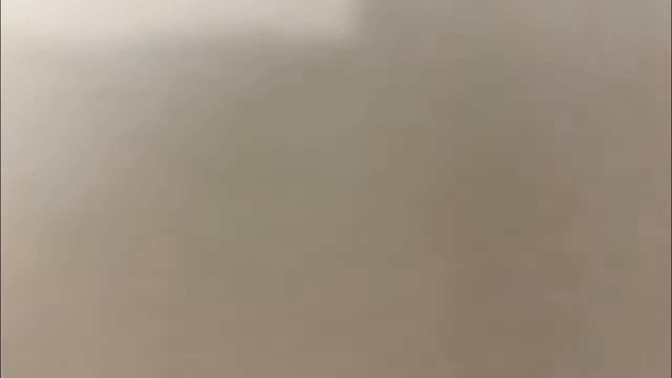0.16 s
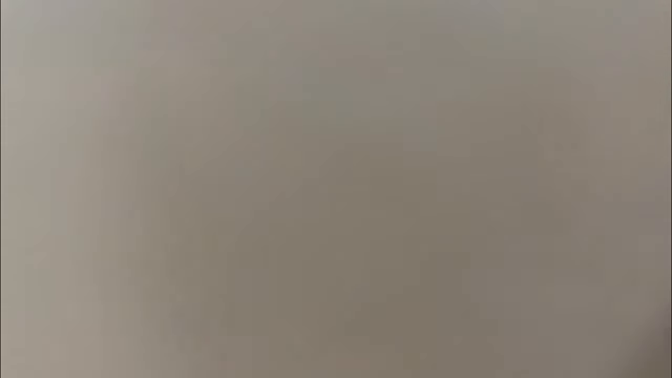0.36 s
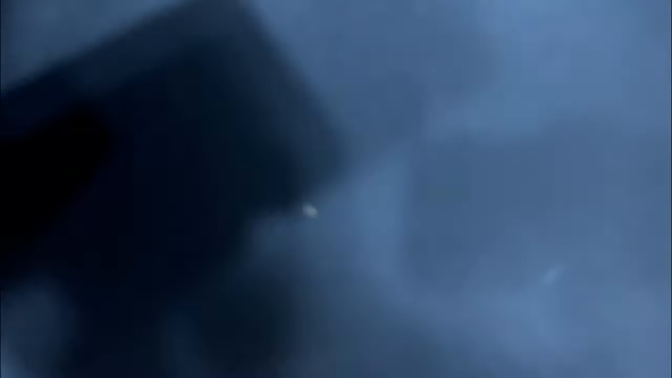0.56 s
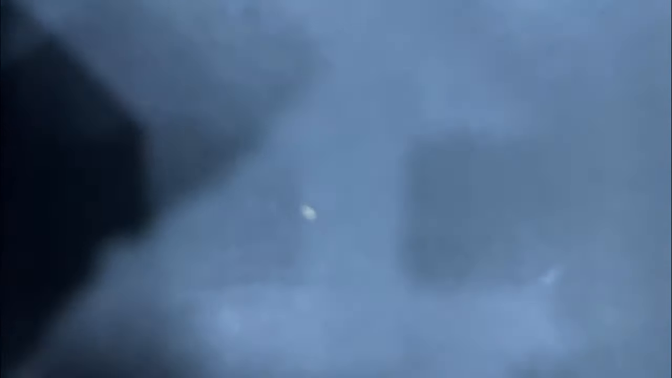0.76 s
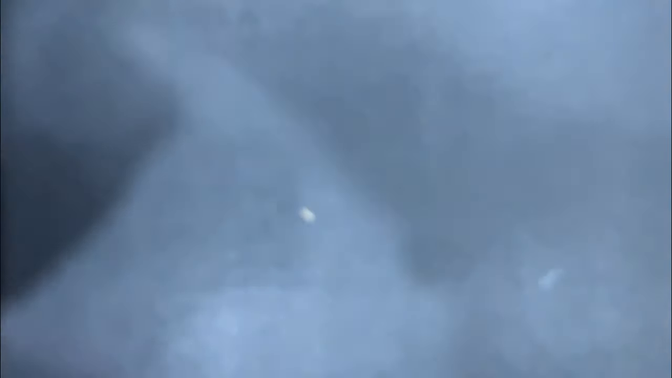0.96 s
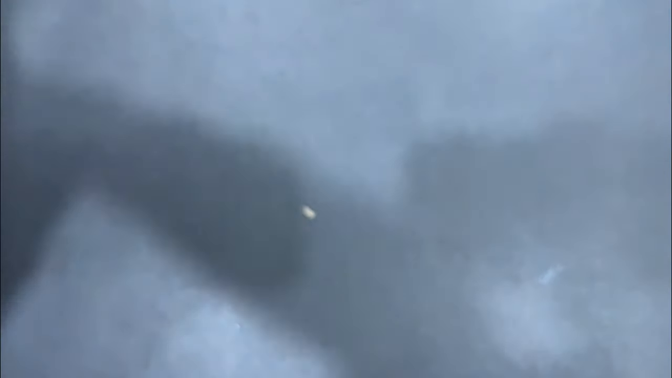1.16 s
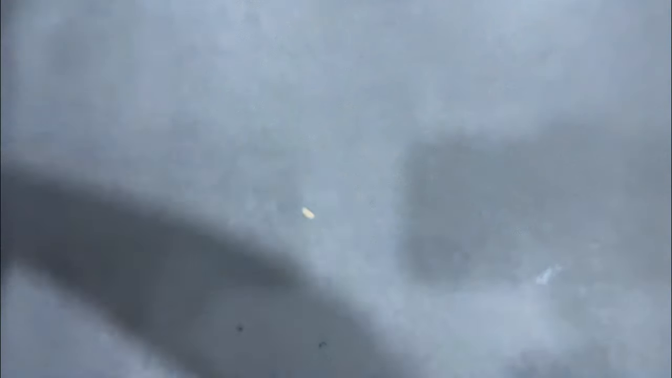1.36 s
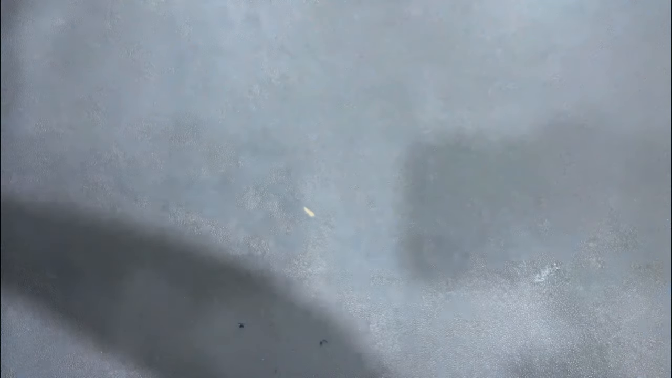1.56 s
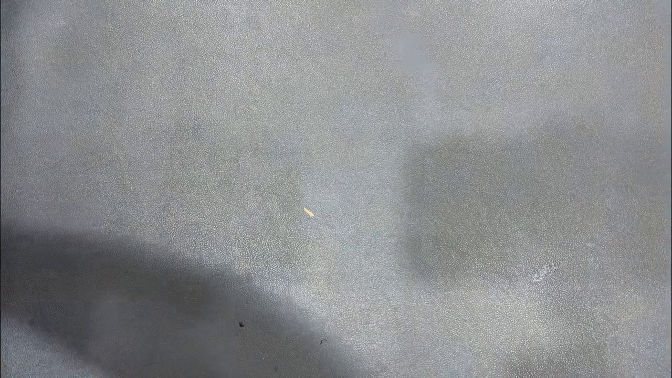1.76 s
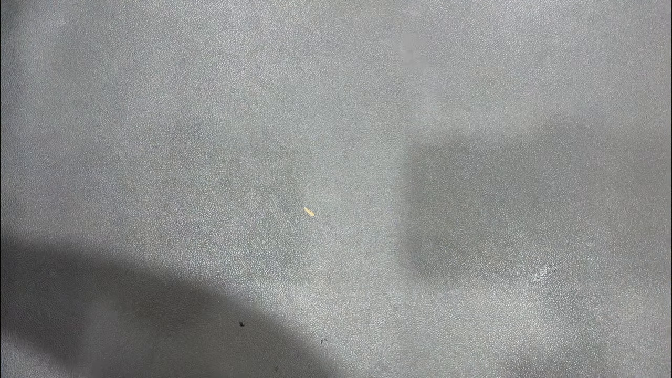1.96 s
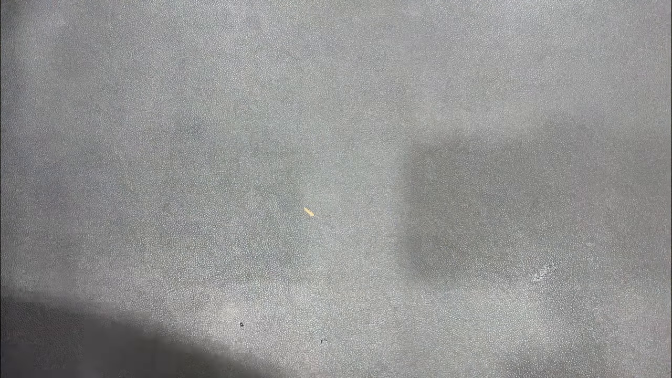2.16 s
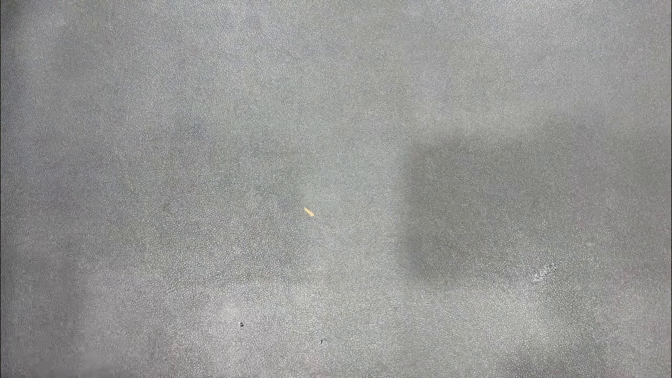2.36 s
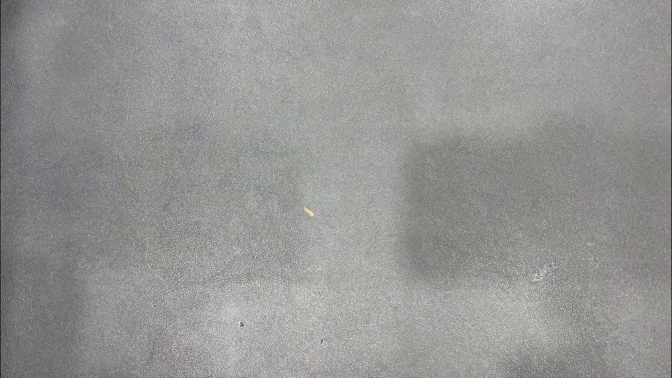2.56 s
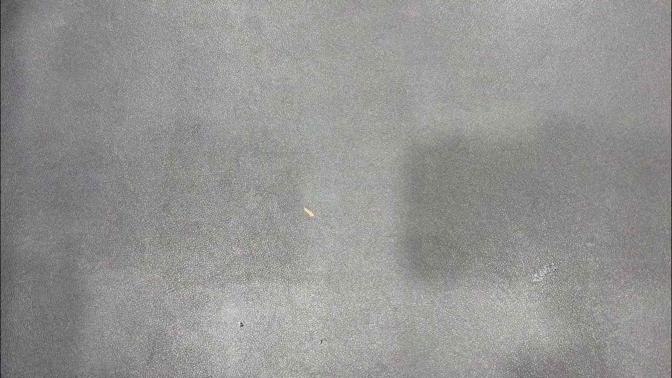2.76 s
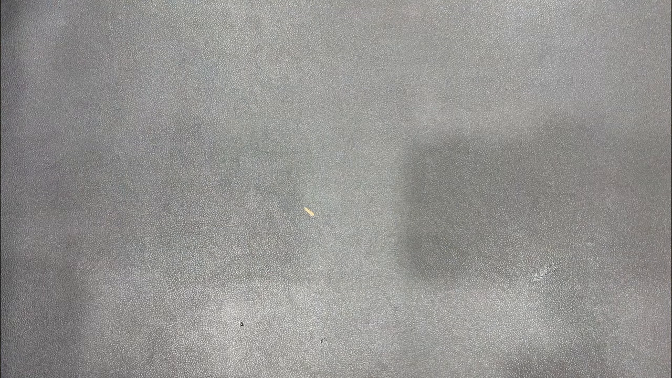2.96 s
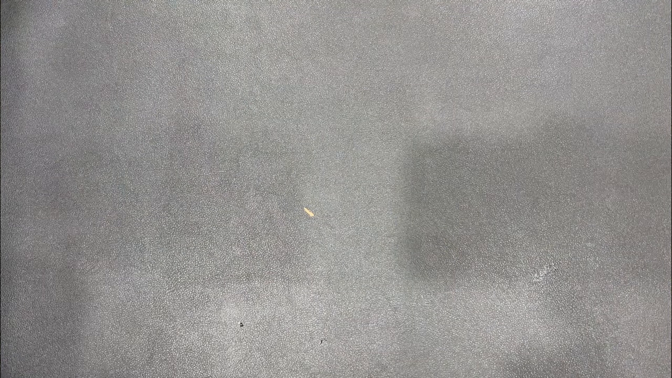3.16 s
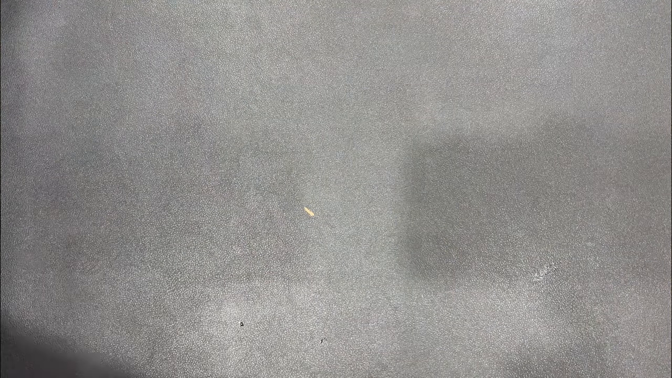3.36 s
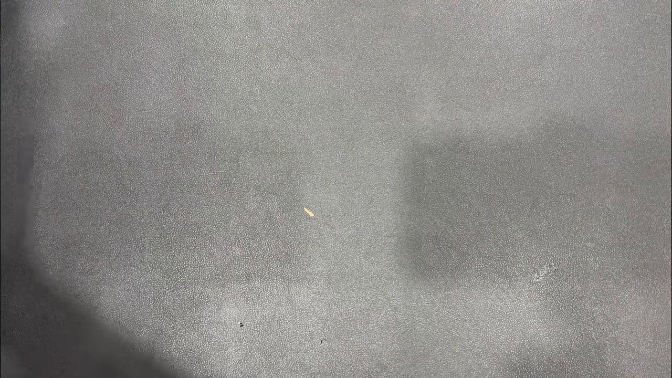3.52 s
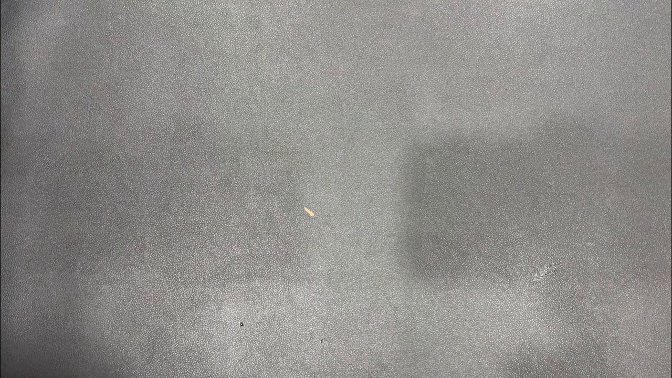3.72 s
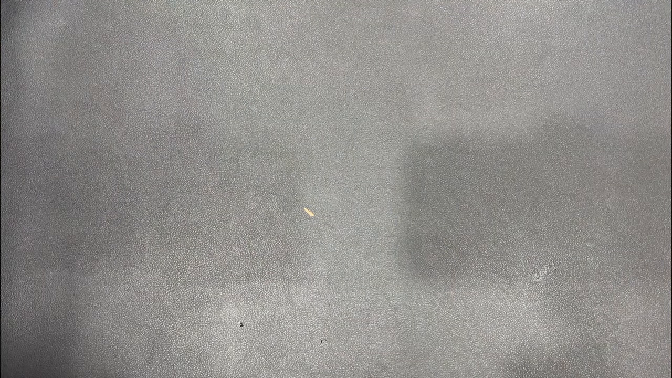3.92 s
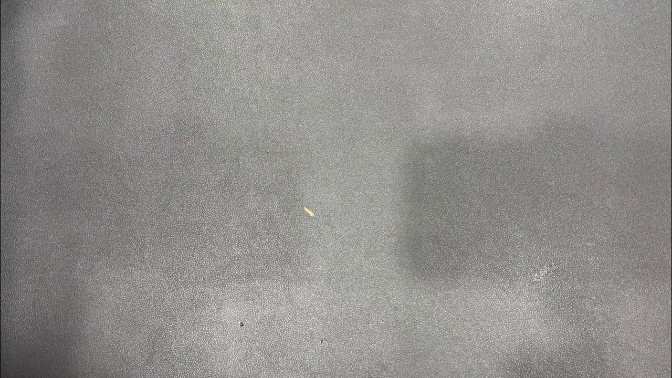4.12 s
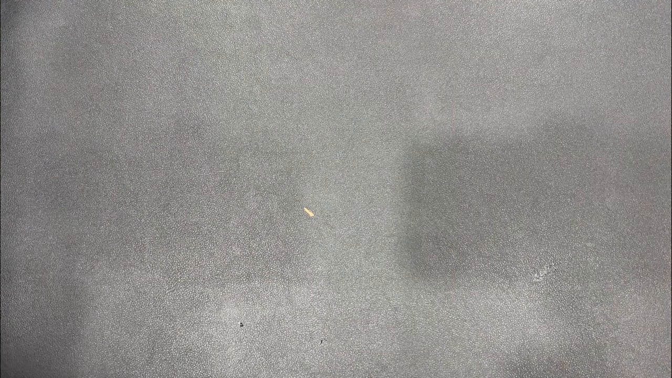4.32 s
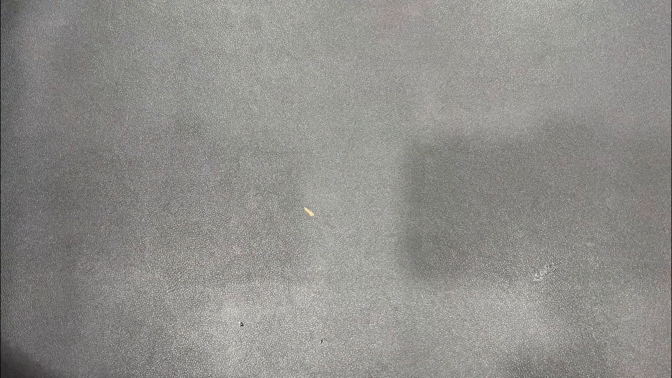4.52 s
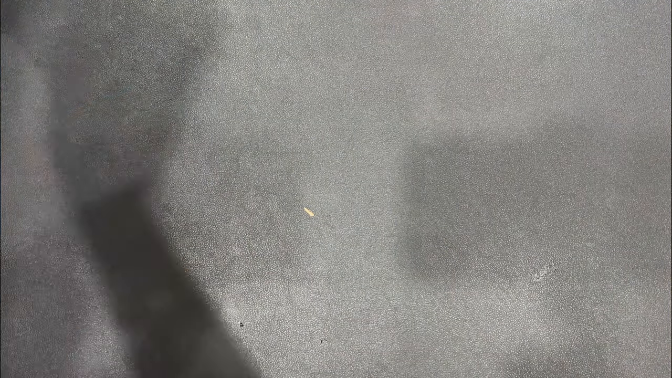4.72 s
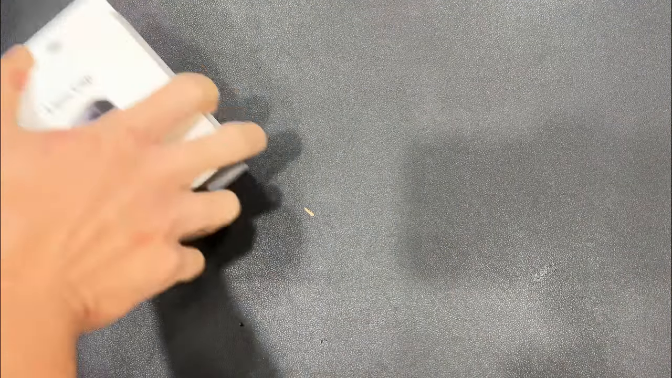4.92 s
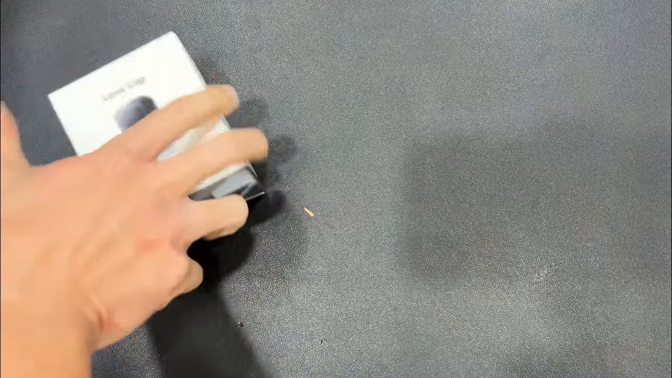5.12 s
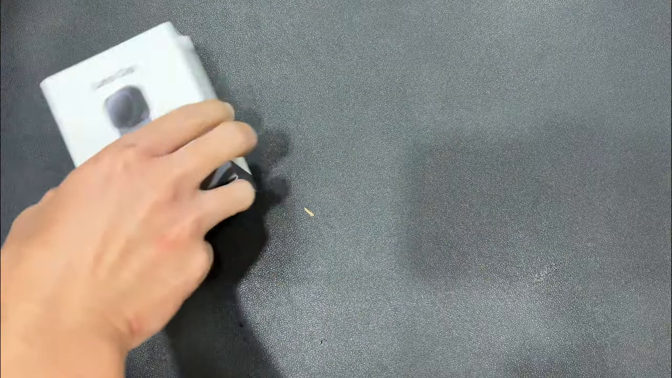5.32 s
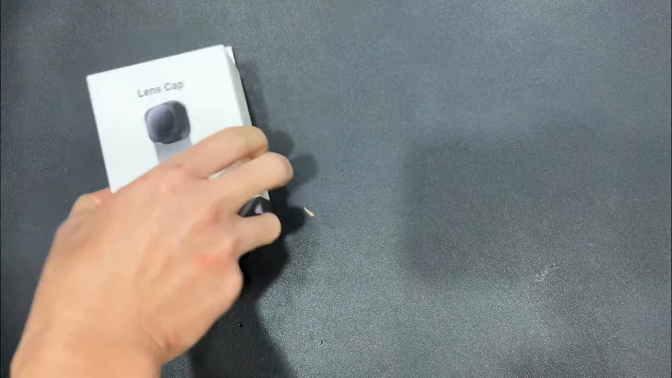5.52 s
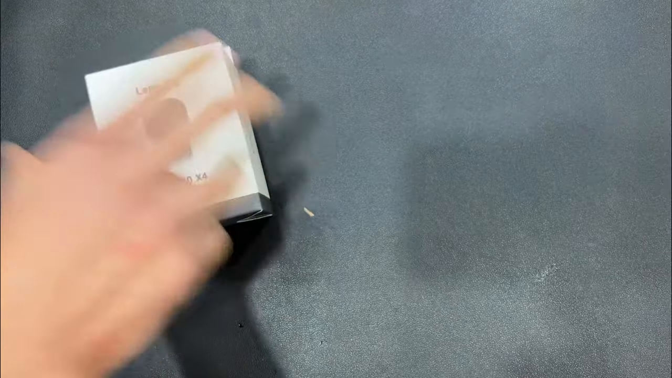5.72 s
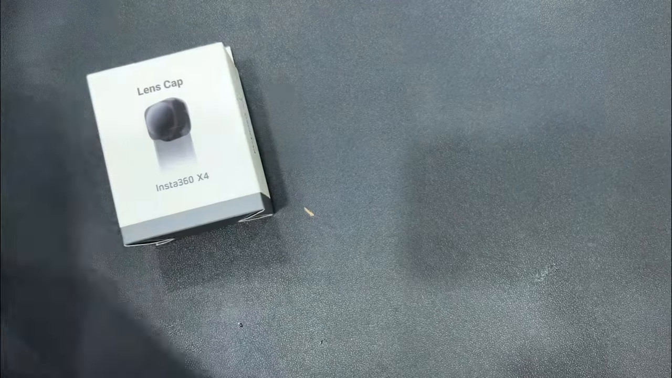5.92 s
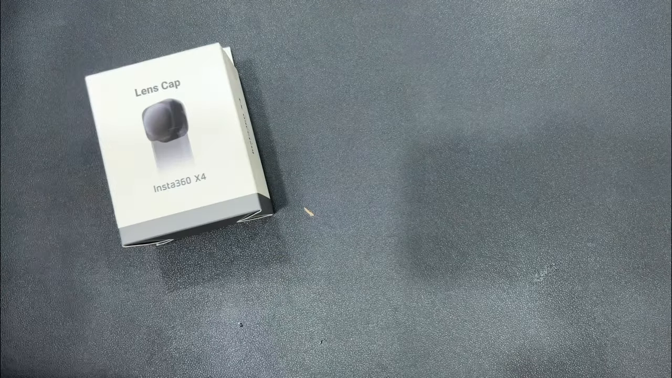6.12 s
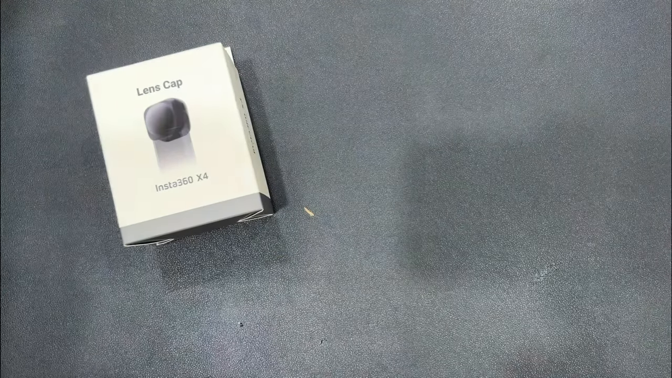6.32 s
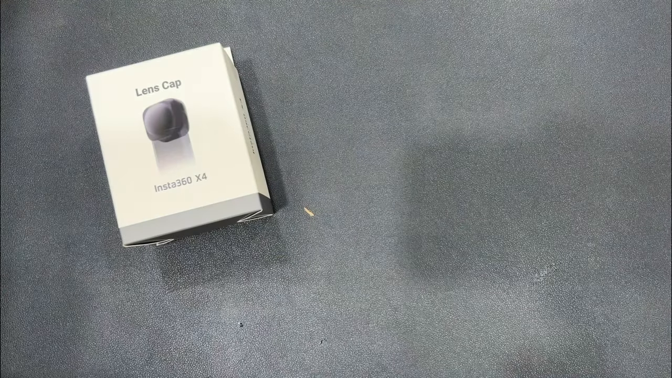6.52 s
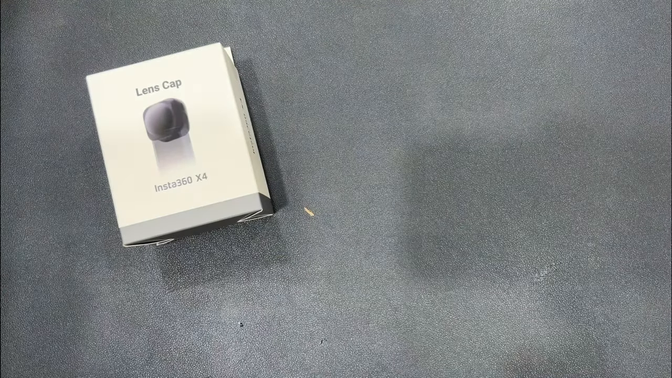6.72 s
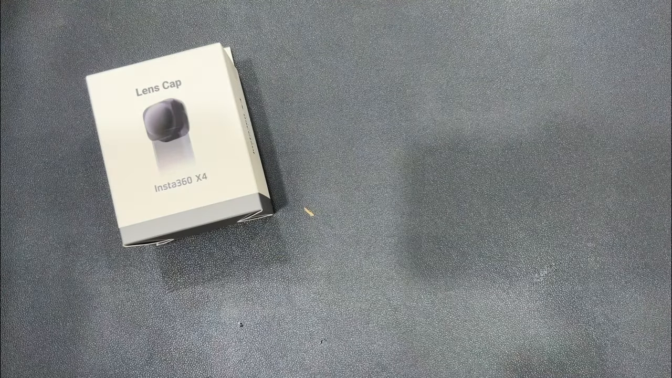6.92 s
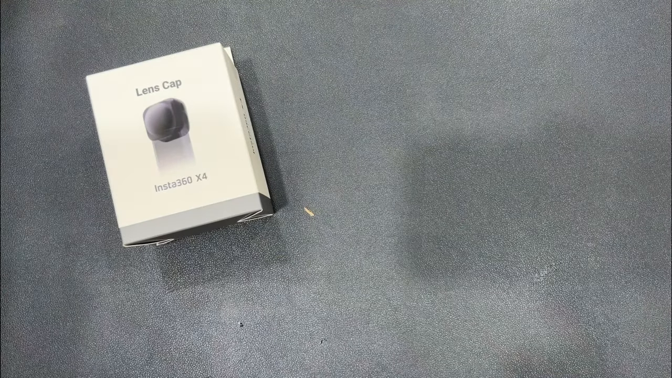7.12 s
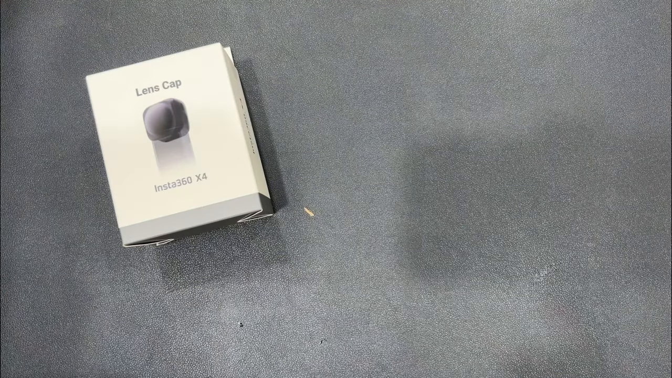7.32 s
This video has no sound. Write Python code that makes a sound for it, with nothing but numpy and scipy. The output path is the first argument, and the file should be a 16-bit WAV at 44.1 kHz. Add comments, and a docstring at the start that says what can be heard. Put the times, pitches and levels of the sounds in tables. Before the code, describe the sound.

Sharp cardboard thuds and a loud double clack on a tabletop, crackly paper rubbing, then another knock and soft scraping in a small room.

```python
"""Cardboard boxes are bumped, opened and set down on a table in a small quiet room, near a two-port microphone.
Knocks are built of low, middle and high rings, each a sum of decaying sine modes of box and table top;
edges tick and paper fibres snap as crackly noise bursts, and paper and card rub as grainy hiss.
Low rumble and murmur fill the room at rest, with a narrow wavering hum. The walls answer with scattered
noise tails, the microphone colours the whole, and a soft limit keeps the peaks below full scale."""
import sys
import numpy as np
from scipy import signal
from scipy.fft import rfft, irfft, next_fast_len
from scipy.io import wavfile
from scipy.ndimage import uniform_filter1d

SR = 44100
rng = np.random.default_rng(int(sys.argv[2]) if len(sys.argv) > 2 else 0)


def to_wav(sig):
    """Store sig (one row per channel, or 1-D mono) as 16-bit WAV at the path in sys.argv[1].

    Samples outside -1..1 are clipped; the rate is SR.
    """
    pcm = np.clip(np.atleast_2d(sig), -1, 1) * 32767
    pcm = np.round(pcm).astype(np.int16)
    wavfile.write(sys.argv[1], SR, pcm.T)  # frames by channels


N = 329868  # length in samples


def amp(db):
    """Gain of a level in dB."""
    return 10 ** (np.asarray(db) / 20)


def unit(x):
    """x scaled to rms 1."""
    return x / np.sqrt(np.mean(x ** 2) + 1e-20)


def along(points, hz):
    """Interpolate (pitch_hz, value) points on a log pitch axis."""
    point_hz, value = np.transpose(points)
    return np.interp(np.log(hz + 1), np.log(point_hz + 1), value)


def filtered(x, response):
    """Multiply the spectrum of x by a complex response of frequency."""
    size = next_fast_len(x.shape[-1] + 8192)  # padding for the filter's ringing
    spectrum = rfft(x, size) * response(np.fft.rfftfreq(size, 1 / SR))
    return irfft(spectrum, size)[..., :x.shape[-1]]


# Likeness of scattered sound at the two ports: pitch_hz, likeness (0 to 1)
PORT_LIKENESS = [(60, 0.96), (180, 1), (550, 0.21), (1650, 0.27), (4970, 0.12), (15000, 0.61)]


def spread(pair):
    """Mix two unrelated signals until they are as alike as scattered sound is at the two ports."""
    def mid_and_side(hz):
        turn = np.arccos(np.clip(along(PORT_LIKENESS, hz), 0, 1)) / 2
        return np.array([np.cos(turn), np.sin(turn)])

    mid, side = filtered(pair, mid_and_side)
    return np.array([mid + side, mid - side])


LEAD_RAD, LEAD_FROM_HZ = .65, 4900  # phase turn at each port, and the pitch where it sets in


def ahead(x):
    """In the treble of direct sound the right port leads in phase."""
    def lead(hz):
        turn_rad = LEAD_RAD * hz ** 8 / (hz ** 8 + LEAD_FROM_HZ ** 8)
        return np.exp(1j * np.outer([-1, 1], turn_rad))

    return filtered(x, lead)


# How fast the small room dies away: pitch_hz, t60_s
ROOM_DECAY = [(80, 0.38), (300, 0.38), (1500, 0.38), (6000, 0.36), (14000, 0.24)]


def decay(length):
    """Two scattered noises in which each frequency dies at the room's speed for it."""
    hz, t, noise = signal.stft(rng.standard_normal((2, length)), SR, nperseg=256)
    fading = noise * amp(-60 * t / along(ROOM_DECAY, hz)[:, None])
    return spread(signal.istft(fading, SR, nperseg=256)[1][:, :length])


def room(x):
    """The walls' answer to a lasting sound, by convolution with a decaying noise tail."""
    tail = decay(SR // 2)
    tail /= np.linalg.norm(tail[0])
    late = np.pad(x, (150, 0))  # the answer starts 150 samples late
    return signal.fftconvolve(late[None], tail, axes=1)[:, :N]


# Spectrum of the low rumble in the room at rest: pitch_hz, relative level_db (per Hz)
RUMBLE_COLOUR = [(18, -52), (30, -24.5), (81, 0.5), (104, -11.5), (156, -11), (171, -7), (219, -7),
                 (305, -16), (402, -19.5), (700, -31.5), (910, -63.5), (1540, -120)]
# Spectrum of the murmur above it: pitch_hz, relative level_db (per Hz)
MURMUR_COLOUR = [(350, -37.5), (600, -3), (707, -9.5), (767, -8), (810, -7.5), (1150, -18), (1810, -20.5),
                 (2500, -22), (3000, -33.5), (15600, -44.5)]
# The hum: pitch_hz, width_hz (rms wander of its pitch), level_db
HUM_TONE = (73, 2.8, -62)
RUMBLE_DB, MURMUR_DB = -55, -71


def stillness():
    """The room's rumble and murmur are coloured noise; the hum is a sine whose pitch wanders randomly."""
    def coloured(points):
        return unit(filtered(rng.standard_normal((2, N)), lambda hz: amp(along(points, hz))))

    rumble, murmur = coloured(RUMBLE_COLOUR), coloured(MURMUR_COLOUR)
    hum_hz, width_hz, hum_db = HUM_TONE
    waver = unit(filtered(rng.standard_normal(N), lambda hz: 1 / (1 + (hz / 6) ** 2)))
    hum = np.sqrt(2) * np.sin(2 * np.pi * np.cumsum(hum_hz + width_hz * waver) / SR)
    return spread(amp(RUMBLE_DB) * rumble + amp(MURMUR_DB) * murmur) + amp(hum_db) * hum


# Strokes of paper and card: start_s (of full strength), relative level_db, swell_s (to rise 20 dB), hold_s,
# fade_s (to fall 20 dB), dullness_db (per octave); a swell or fade below 3 ms, or negative, acts as 3 ms
PAPER_STROKES = [(0, -50, .01, 0, 0.32, 6), (0.078, -59, -0.8, 0.043, -0.33, 7.5),
                 (0.266, -60, 0.03, 0, 0.64, 13.5), (0.99, -69, -1.35, 0.023, 0.35, 7),
                 (1.124, -72.5, -1.2, 0.1, 0.74, 12), (1.804, -57.5, 0, 0.11, 0.56, 14.5),
                 (1.9, -38.5, 0.0264, 0, 0.2624, 6), (2.097, -44.5, 0.1, 0.0053, 0.08, 2),
                 (2.223, -56.5, 0.1, 0, 0.2, 0), (2.388, -58.5, 0.02, 0, 0.09, 9.5),
                 (2.752, -48.5, 0, 0.035, 0.14, 5.5), (2.934, -53.5, 0, 0.23, 0.38, 3),
                 (3.145, -41, 0.1942, 0.023, 0.16, -1.5), (3.347, -52, 0.46, 0, 0.12, 6.5),
                 (3.517, -37.5, -0.14, 0.02, 0.08, -2.5), (3.552, -37, -0.03, 0, 0.22, 1.1),
                 (3.702, -37.5, 0.0836, .2, 0.1861, -2), (4.07, -52.5, -0.67, 0.28, -0.01, -2),
                 (4.124, -44.5, -0.03, 0, 0.05, -3), (4.167, -49, 0, 0.023, 0, -4),
                 (4.296, -45.5, 0.02, 0.0018, 0.02, 1), (4.386, -45, 0.01, 0.0045, 0.15, -1),
                 (4.49, -56.5, 1.27, 0.048, -0.05, -0.3), (4.582, -72, 3, 0, 0.7, 10),
                 (5.098, -48, 0.0862, 0.013, 0.1561, 4.5), (5.286, -58.5, 0.17, 0.025, 0.12, 7.5),
                 (5.516, -60, 0, 0.03, 0.16, 6.5), (6.254, -43.5, -0.084, 0.14, 0.1, -0.5),
                 (6.475, -54, 0.13, 0, 1, 1.6), (6.928, -41, 0.0964, 0.078, 0.24, -0.9),
                 (7.17, -48.5, 0.15, 0.15, -0.5, 1.5), (7.276, -35, 0.19, 0, 0.12, -3),
                 (7.435, -49, 0.23, 0.039, -2.9, -0.3)]


def strokes(t):
    """Strength of the rubbing at times t, and its dullness, led by the loudest stroke."""
    start, db, swell, hold, fade, dull = np.transpose(PAPER_STROKES)[:, :, None]
    before = np.maximum(start - t, 0) / np.maximum(swell, .003)
    after = np.maximum(t - start - hold, 0) / np.maximum(fade, .003)
    power = amp(db - 20 * np.minimum(before + after, 5)) ** 2  # at most 100 dB down
    total = power.sum(axis=0)
    return np.sqrt(total), (power * dull).sum(axis=0) / total


# Colour of rubbed paper, before each stroke's dullness: pitch_hz, relative level_db (per Hz)
PAPER_COLOUR = [(180, -34.5), (300, 4), (810, -1.5), (1210, -1), (1350, -7), (1520, 0.5), (1850, -0.5),
                (4240, -3), (8510, -4.5), (9710, -7), (11100, -6.5), (15700, -12)]
CATCHES_PER_S, CATCH_FADE_S = 300, 0.00047


def rubbing():
    """Fibres catch and slip: hiss whose strength jumps in short grains, patchy in colour."""
    noise = signal.stft(rng.standard_normal((3, N)), nperseg=256)[2]
    hz = np.linspace(0, SR / 2, noise.shape[1])[:, None]
    t = np.arange(noise.shape[2]) * 128 / SR
    strength, dull_db = strokes(t)
    patches = uniform_filter1d(rng.standard_normal(noise.shape[1:]), size=5, axis=0)
    patches = uniform_filter1d(patches, size=9, axis=1)
    colour = amp(along(PAPER_COLOUR, hz) - dull_db * np.log2(hz / 5000 + 0.35))
    colour /= np.sqrt(np.mean(colour ** 2 * (hz > 1500), axis=0))  # level set by the band above 1500 Hz
    hiss = signal.istft(noise * colour * amp(2.2 * unit(patches)), nperseg=256)[1][:, :N]
    catches = (rng.random(N) < CATCHES_PER_S / SR) * amp(2.6 * rng.exponential(size=N))
    slip = np.exp(-1 / (CATCH_FADE_S * SR))
    grain = 1 + .6 * signal.lfilter([1], [1, -slip], np.minimum(catches, 5))
    return np.interp(np.arange(N) / SR, t, strength) * unit(grain) * hiss


# Edge contacts: start_s, relative level_db, centre_hz, above_db (fall per octave above centre, sign ignored),
# t60_s (of the burst, at least 3 ms)
EDGE_TICKS = [(0.031, -29, 1200, 4.5, 0.029), (0.09, -27.5, 2080, 23, 0.019), (.0895, -34, 9500, 7, .015),
              (0.1085, -29, 8500, 1.5, 0.012), (.147, -36, 9500, 7.5, .012),
              (0.1555, -25.5, 4500, 13.5, 0.01), (0.2648, -26, 1520, 3.5, 0.015),
              (.4255, -37.5, 1490, 10, 0.0083), (0.448, -3.5, 2470, 21, 0.028),
              (0.4486, -30, 10000, -0.5, 0.04), (0.4863, 4, 1600, 16.5, 0.016),
              (0.486, -5.5, 7950, -1, 0.01), (0.4938, -5.5, 1690, 11.5, .013),
              (0.4946, -8, 8003, 1.5, 0.0058), (0.511, -5, 1697, 11.5, .018),
              (0.5109, -17, 8000, -2, 0.017), (.557, -40.5, 7000, -5, 0.017),
              (0.583, -35, 6500, 3.5, 0.021), (1.8136, -43, 1570, 2.5, 0.027),
              (1.8812, -7.5, 3800, 8.5, 0.018), (1.8879, -7, 3620, 11, 0.011),
              (1.8915, -7, 3540, 12, 0.032), (1.9172, -8.5, 3700, 7.5, 0.027),
              (1.923, -11, 5360, 22.5, 0.024), (1.93, -24.5, 2430, 15, 0.48), (2.086, -26, 7000, 3, 0.015),
              (2.535, -47.5, 5990, 12, 0.014), (2.1, -21, 1550, 3, 0.035), (2.208, -33, 1580, 3.5, 0.028),
              (2.377, -44, 2940, -5, .02), (2.3885, -33.5, 4460, 3.5, 0.02),
              (2.7453, -29, 1900, 2.5, 0.016), (3.2258, -21.5, 7700, 7.5, 0.032),
              (3.273, -25.5, 2060, 7.5, 0.038), (3.4486, -38.5, 5530, 11, 0.027),
              (3.5154, -18, 5700, 2.5, 0.029), (3.5498, -11, 8600, 4, 0.042),
              (4.3818, -28, 8070, 14, 0.034), (4.82, -48.5, 2320, 0.5, 0.024),
              (4.979, -46, 1800, 6.5, 0.06), (5.038, -13, 1530, 6.5, 0.077), (5.114, -27, 1210, 13, 0.018),
              (5.332, -38, 2230, 3, 0.031), (5.471, -23, 1820, 5.5, 0.021), (5.4988, -25.5, 2010, 5, 0.03),
              (6.244, -36.5, 6000, 12, .05), (6.517, -30.5, 8700, 9, 0.028), (6.6514, -34, 4940, 2, 0.032),
              (6.818, -34, 2330, 0, 0.034)]
# Paper fibres snapping: start_s, relative level_db
FIBRE_SNAPS = [(.312, -48), (2.9635, -30), (3.1303, -25.5), (3.1714, -26), (3.188, -29), (3.34, -36),
               (3.735, -24), (3.7468, -22), (3.77, -22), (4.045, -36.5), (4.1322, -32.5), (4.175, -32),
               (4.204, -30.5), (4.281, -31), (4.288, -31), (4.357, -34), (6.2525, -31.5), (6.2633, -26),
               (6.2851, -29), (6.292, -26.5), (6.3672, -26), (6.581, -38)]
# Shape shared by all snaps: centre_hz, above_db (fall per octave above centre), t60_s
FIBRE_SHAPE = (8300, 8.2, 0.015)
SNAP_BOOST_DB = 4.5  # lift of the snaps against the ticks
CRACKLE_DB, RISE_SHARE = 5, 0.025  # scatter of strength within a tick; its rise as a share of its t60
# the fall per octave below a centre steepens by BELOW_DB for each octave the centre lies above BELOW_FROM_HZ
BELOW_DB, BELOW_FROM_HZ = 2, 590


def ticks():
    """Edges and fibres give short crackly noise bursts around a pitch; each draws its own wall answer."""
    out, t = np.zeros((2, N + SR)), np.arange(SR // 3) / SR
    rows = EDGE_TICKS + [(start, db + SNAP_BOOST_DB, *FIBRE_SHAPE) for start, db in FIBRE_SNAPS]
    noise = rng.standard_normal((len(rows), len(t)))
    steps = rng.standard_normal((len(rows), len(t) // 30 + 1))
    crackle = amp(CRACKLE_DB * np.repeat(steps, 30, axis=1)[:, :len(t)])  # new strength every 30 samples
    for (start, db, centre, above_db, t60), hiss, grit in zip(rows, noise, crackle):
        def colour(hz):
            below_db = BELOW_DB * np.log2(centre / BELOW_FROM_HZ)
            slope_db = np.where(hz < centre, below_db, -abs(above_db))
            return amp(slope_db * np.log2((hz + 150) / centre))

        t60 = max(t60, .003)
        shape = amp(-60 * t / t60) * (1 - np.exp(-t / (RISE_SHARE * t60)))
        burst = shape * ahead(filtered(hiss * grit, colour))
        burst *= np.linalg.norm(shape) / np.linalg.norm(burst[0])
        walls = filtered(decay(len(t)), colour) * (1 - np.exp(-t / .006))
        walls *= amp(-10.0) * np.linalg.norm(shape) / np.linalg.norm(walls[0])
        out[:, round(start * SR):][:, :len(t)] += amp(db - 8.5) * (burst + walls)
    return out[:, :N]


# Low, middle and high rings of knocks; several rows may sound in one knock: start_s,
# level_db (peak of the ring before lean and walls), pitch_hz (favoured), ring_share (of the modes' t60,
# kept within .1 to 4), focus_db (per octave), contact_s (at least 0.5 ms)
KNOCK_RINGS = [(.006, -15, 324, 0.45, 19, 0.0074), (.004, -34, 940, 0.72, 59, 0.0017),
               (.011, -21, 137, 0.24, 25.5, 0.0021), (.029, -20.5, 161, 0.61, 28, 0.006),
               (.054, -24, 152, 0.43, 34.5, 0.01), (0.03, -33.5, 896, 0.98, 76, 0.0044),
               (.165, -30, 104, 0.31, 13.5, 0.0084), (.266, -26.5, 482, 0.25, 17.5, 0.0025),
               (0.283, -35, 153, 0.46, 17.5, 0.0072), (.389, -37.5, 61.5, 1, 9, 0.0086),
               (0.425, -40, 743, 2.3, 10, 0.02), (.448, -7.5, 487, 0.12, 14.5, 0.0035),
               (.449, -8, 743, 0.22, 16, 0.001), (.4575, -7.5, 109, 0.33, 12, 0.0071),
               (.485, -9, 304, 0.34, 14, 0.0069), (.487, -7.5, 907, 0.49, 18.5, 0.00073),
               (0.489, -13.5, 1775, 0.73, 49, 0.0013), (.494, -7, 105.4, 0.25, 22.5, 0.012),
               (.498, -12.5, 574, .6, 29.5, 0.003), (.511, -7.5, 747.4, .45, 10, 0.0015),
               (.513, -17, 1688, 0.64, 51, .0017), (.519, -6.5, 141.2, 0.35, 13, 0.0046),
               (.548, -26, 1050, .8, 47, 0.0027), (.585, -40, 1017, 1.5, 31, 0.049),
               (0.541, -20.5, 469, 0.42, 12.5, 0.004), (0.997, -47.5, 242, .75, 10, 0.003),
               (1.0, -46.5, 774, .62, 12, .002), (1.423, -42, 84, .6, 29, 0.03),
               (1.799, -33, 720, 0.76, 15, .0016), (1.883, -27.5, 583, 0.73, 22.5, .005),
               (1.88, -17, 3750, 1, 58.5, 0.0019), (1.884, -23, 1616, .8, 50, 0.00094),
               (1.903, -27.5, 2230, .35, 28, 0.0025), (1.907, -21.5, 112.5, 0.97, 6, 0.0038),
               (1.919, -28.5, 743, 0.86, 58.5, 0.0034), (1.941, -30, 2300, .5, 17, 0.0036),
               (1.95, -35, 765, 1.3, 71, 0.023), (1.946, -29, 94, 0.47, 27, 0.0021),
               (2.088, -20.5, 300, 0.5, 22, 0.014), (2.099, -35, 921, 0.89, 37, 0.0035),
               (2.12, -29.5, 305, 0.76, 35, 0.012), (2.2172, -23.5, 186, 0.23, 12, 0.005),
               (2.249, -38, 308, 0.4, 4, 0.0045), (2.467, -38.5, 55.2, 0.83, 10, 0.0045),
               (2.745, -38, 185, 1.8, 15, 0.0044), (2.746, -40, 1060, 1.4, 36, 0.0021),
               (2.779, -29, 223.4, 0.72, 2, 0.0098), (2.904, -40.5, 342, 0.45, 7, 0.0042),
               (2.969, -35.5, 71.4, 1.4, 2.5, 0.0021), (3.061, -33.5, 110, 1.4, 18, 0.0017),
               (3.273, -33.5, 780, 0.57, 14, 0.0019), (3.277, -24.5, 245, 0.28, 8.5, 0.0063),
               (3.312, -35, 327, 0.53, 57, 0.0074), (3.516, -32.5, 294, 0.51, 12, 0.0088),
               (3.548, -21, 335, 0.43, 2, 0.003), (3.725, -31.5, 315, 0.9, 18, 0.0026),
               (3.776, -21.5, 196, 0.39, 35, 0.0052), (3.801, -25.5, 65, 0.73, 25, 0.0023),
               (3.831, -24, 190, 0.66, 29, 0.004), (3.902, -42, 188, 0.53, 27, .01),
               (5.0417, -9.5, 519, 0.5, 16.5, 0.004), (5.044, -19, 207, .5, 16, 0.0074),
               (5.06, -20, 349, 0.29, 12, 0.0079), (5.096, -25, 480, 0.67, 5, .004),
               (5.127, -28, 504, 0.64, 17, 0.0026), (5.054, -15.5, 118.4, 0.38, 22, 0.009),
               (5.095, -27, 90.6, 0.36, 21, 0.014), (5.122, -25.5, 80, 0.33, 12, 0.016),
               (5.16, -30, 66, 0.7, 25, 0.017), (5.197, -34, 69.3, .7, 18, .014),
               (5.473, -31.5, 326, 0.25, 10, 0.007), (5.5, -38.5, 1080, 0.4, 26, 0.0044),
               (5.501, -27.5, 579, 0.29, 30, 0.003), (5.5155, -24.5, 100.3, 0.27, 17, 0.0062),
               (5.533, -29.5, 65, 0.5, 25, 0.012), (6.403, -40.5, 110, 1.5, 3.5, 0.006)]
# Modes of the boxes and table top: pitch_hz, relative level_db, t60_s
BOX_MODES = [(65, -2, 0.36), (84, 0, 0.38), (114.5, -4, 0.29), (138, 4.5, 0.14), (208.2, 3.5, 0.18),
             (237, -4, 0.35), (284.7, 0, 0.27), (311.3, 1, 0.22), (458.3, 3, 0.11), (574, 1.5, 0.1),
             (750, -4, .12), (940, -6, .1), (1060, -8, .15), (1730, -3.5, 0.061), (1903, -11, 0.14),
             (2210, -13, 0.17), (3750, -16, 0.018)]
LEAN_HZ = 2000  # a mode's left-right imbalance is its pitch over this, up to .2


def knocks():
    """Each ring of a knock favours modes near its pitch and bends the nearest to it; soft contact swells in."""
    out, t = np.zeros((2, N + SR)), np.arange(SR // 2) / SR
    free_hz, level_db, t60 = np.transpose(BOX_MODES)[:, :, None]
    chance = rng.standard_normal((len(KNOCK_RINGS), 3, len(BOX_MODES), 1))
    for (start, db, pitch, share, focus_db, contact), (loud, tune, lean) in zip(KNOCK_RINGS, chance):
        def near(hz, fall_db):
            return amp(-fall_db * np.abs(np.log2((hz + 1) / pitch)))

        closeness = near(free_hz, 1)
        hz = np.where(closeness == closeness.max(), pitch, free_hz)  # the grip on the box bends this mode
        ring_t60 = t60 * np.clip(share, .1, 4)
        fade = near(hz, focus_db) * amp(level_db + 2 * loud - 60 * t / ring_t60)
        swell = np.sin(np.pi / 2 * np.minimum(t / max(contact, .0005), 1)) ** 2
        modes = swell * fade * np.sin(2 * np.pi * hz * (1 + .01 * tune) * t)
        modes /= np.abs(modes.sum(axis=0)).max()
        ring = modes.sum(axis=0)
        side = np.sum(modes * lean * np.minimum(hz / LEAN_HZ, .2), axis=0)
        # the walls prolong the ringing modes
        echo = signal.fftconvolve(ring[None], decay(len(t)), axes=1)[:, :len(t)]
        echo *= amp(-13.5) * np.linalg.norm(ring) / np.linalg.norm(echo[0])
        # and add a diffuse tail around the ring's pitch
        walls = filtered(decay(len(t)), lambda f: near(f, min(focus_db, 14))) * (1 - np.exp(-t / 0.0032))
        walls *= amp(-13.0) * np.linalg.norm(ring) / np.linalg.norm(walls[0])
        heard = ring + np.outer([1, -1], side) + walls + echo
        out[:, round(start * SR):][:, :len(t)] += amp(db) * heard
    return out[:, :N]


def scene():
    """Knocks and ticks come straight and off the walls; the rubbing comes partly straight, partly scattered."""
    rub = rubbing()
    boxes = knocks() + ticks()
    paper = amp(-3.5) * ahead(rub[-1]) + amp(-4.5) * spread(rub[:2]) + amp(-8.5) * room(rub[0])
    return boxes + paper + stillness()


# Resonances of the microphone ports: pitch_hz, width_hz, level_db (gain)
PORT_RESONANCES = [(6250, 760, 3.5), (8530, 1100, 4.5)]
BASS_HZ, TOP_HZ = 45, 15750  # bass roll-off and band limit


def record(dry):
    """The microphone rolls off deep bass, rings at its ports and ends at its band limit; peaks are soft-limited."""
    def microphone(hz):
        ports = 1
        for centre, width, db in PORT_RESONANCES:
            ports = ports + (amp(db) - 1) * 1j * hz * width / (centre ** 2 - hz ** 2 + 1j * hz * width)
        return (1j * hz / (1j * hz + BASS_HZ)) ** 2 * ports

    heard = filtered(dry, microphone)
    heard = heard / (1 + np.abs(heard / .95) ** 6) ** (1 / 6)  # a soft limit keeps the peaks below full scale
    return filtered(heard, lambda hz: 1 / (1 + (hz / TOP_HZ) ** 200))


dry = scene()
out = record(dry)
to_wav(out)
```